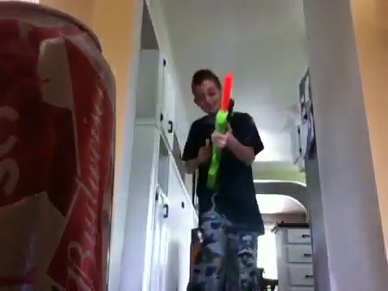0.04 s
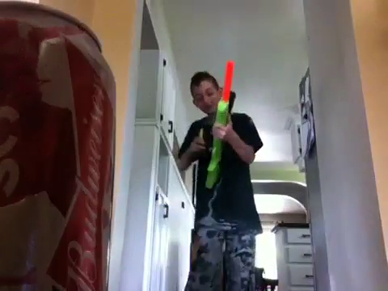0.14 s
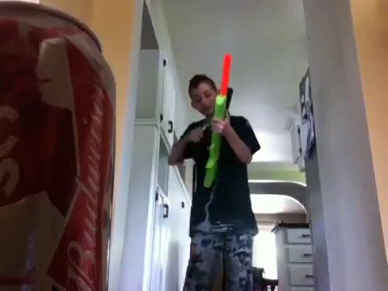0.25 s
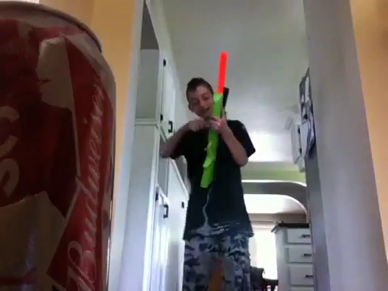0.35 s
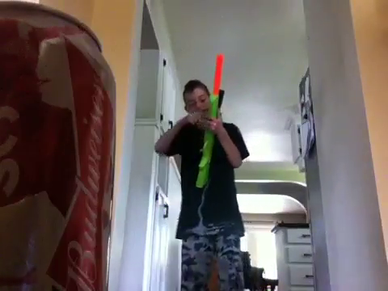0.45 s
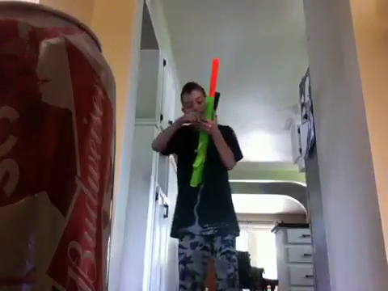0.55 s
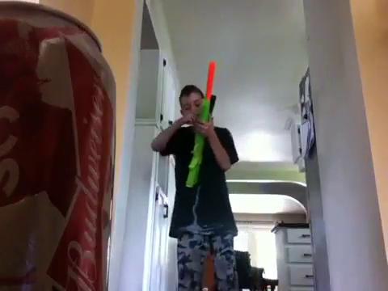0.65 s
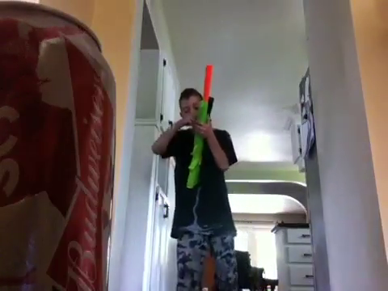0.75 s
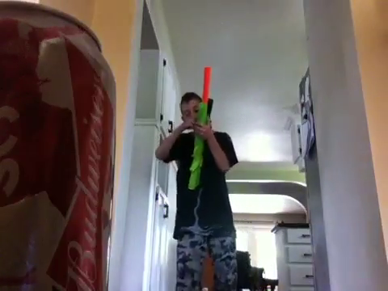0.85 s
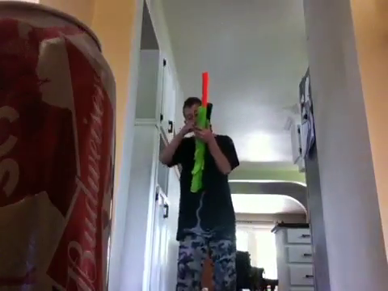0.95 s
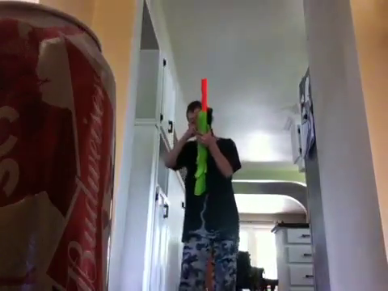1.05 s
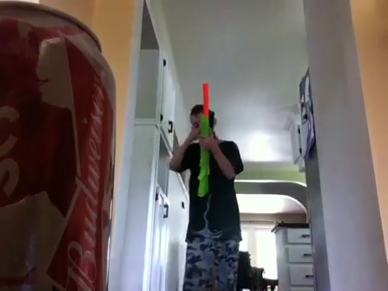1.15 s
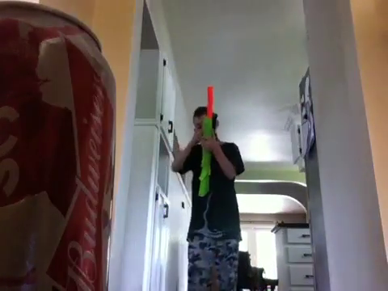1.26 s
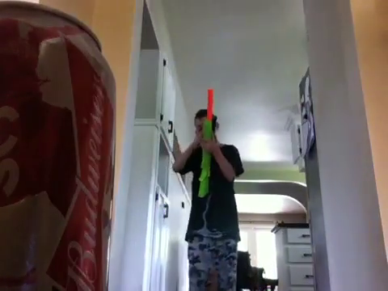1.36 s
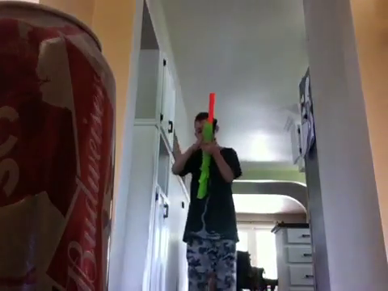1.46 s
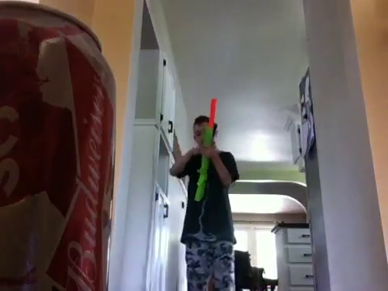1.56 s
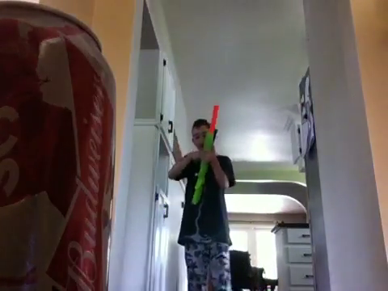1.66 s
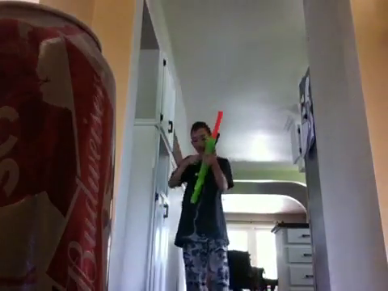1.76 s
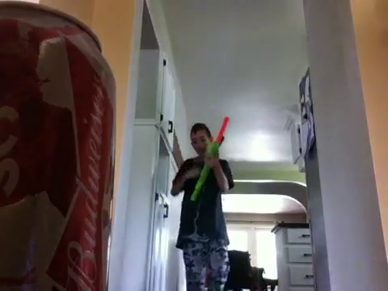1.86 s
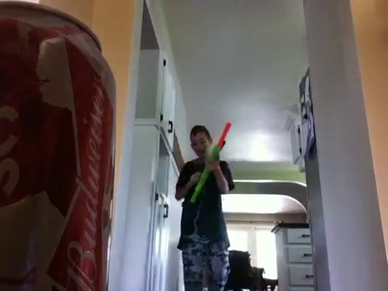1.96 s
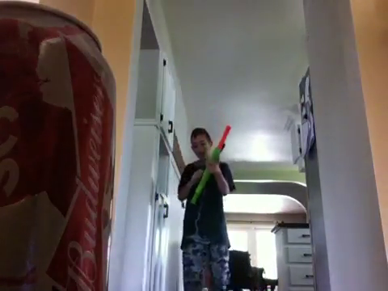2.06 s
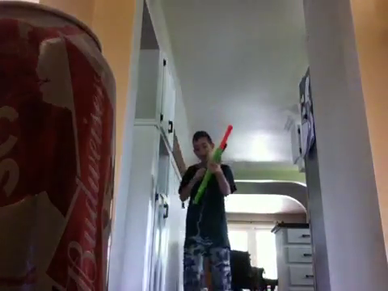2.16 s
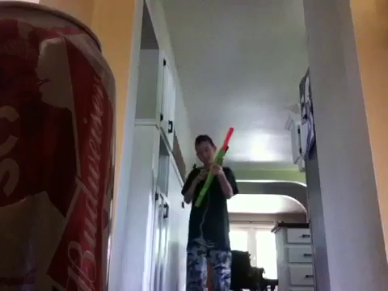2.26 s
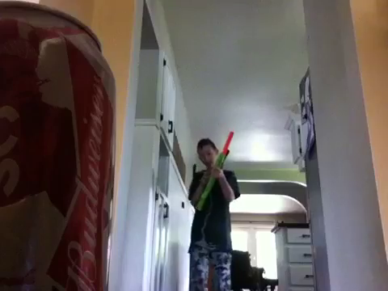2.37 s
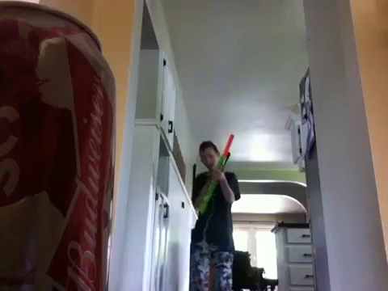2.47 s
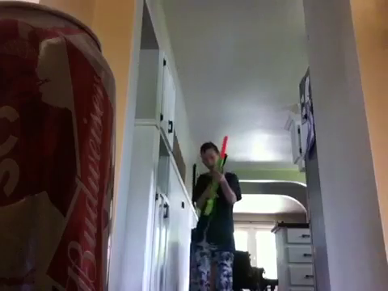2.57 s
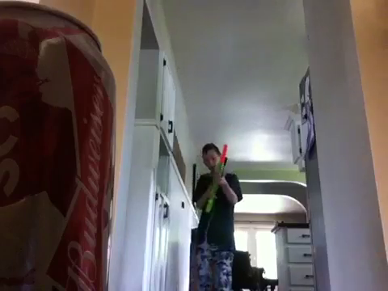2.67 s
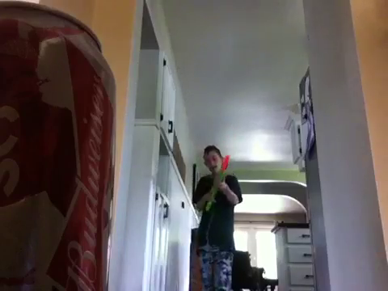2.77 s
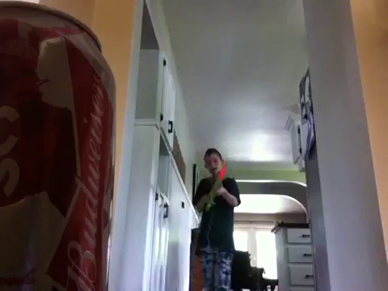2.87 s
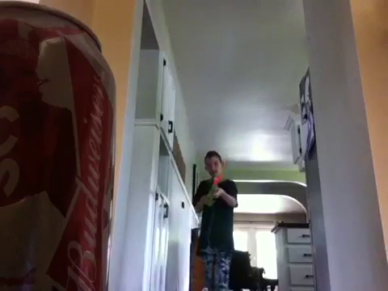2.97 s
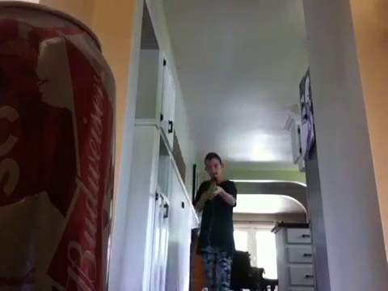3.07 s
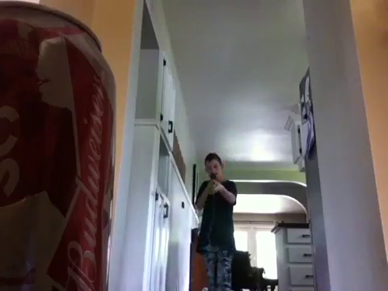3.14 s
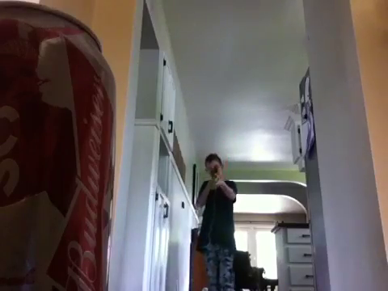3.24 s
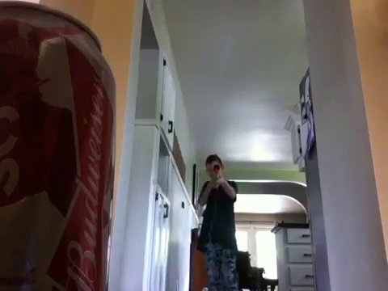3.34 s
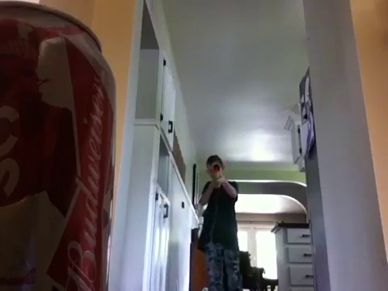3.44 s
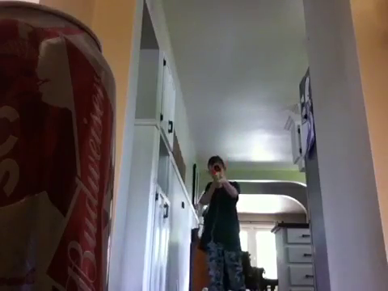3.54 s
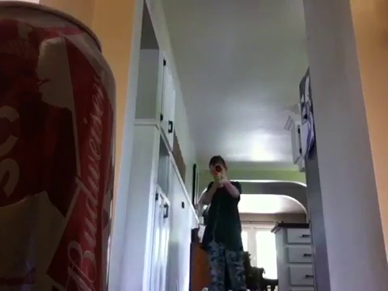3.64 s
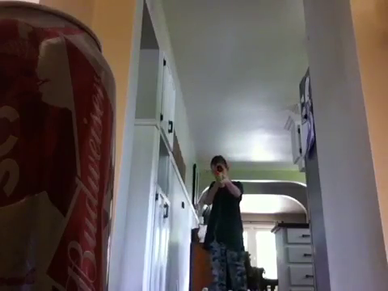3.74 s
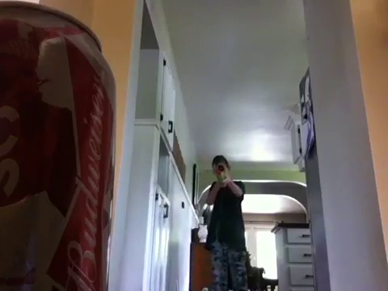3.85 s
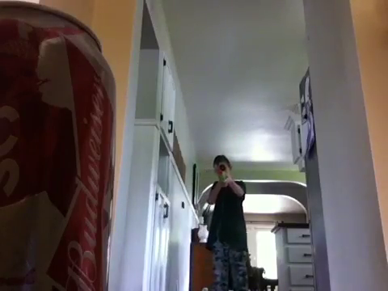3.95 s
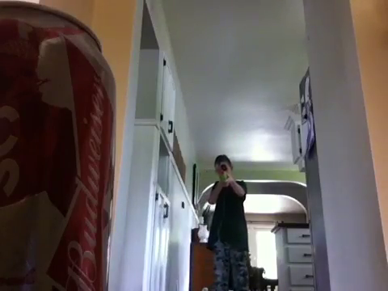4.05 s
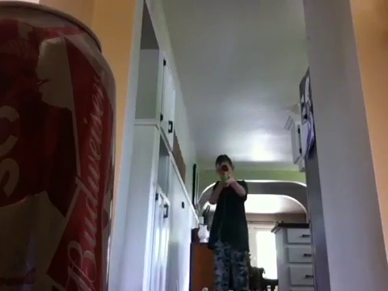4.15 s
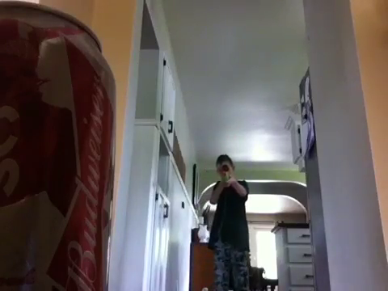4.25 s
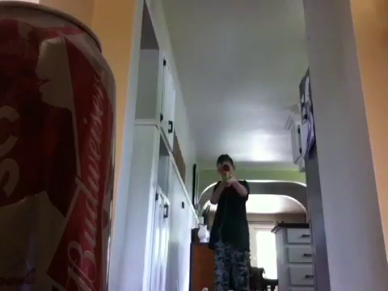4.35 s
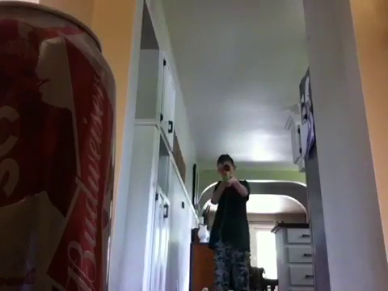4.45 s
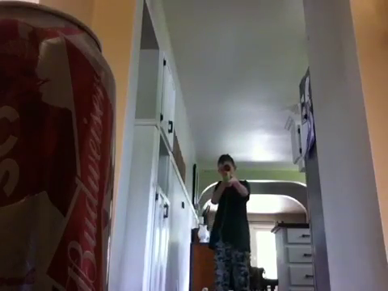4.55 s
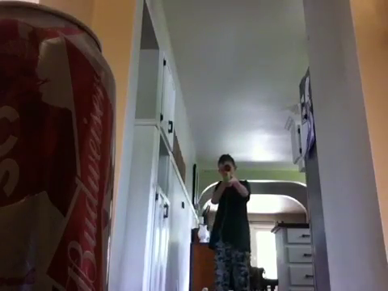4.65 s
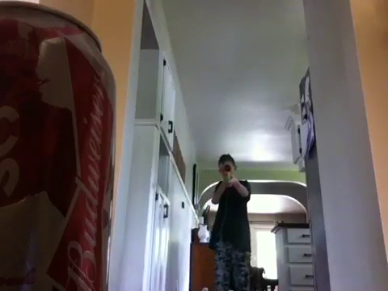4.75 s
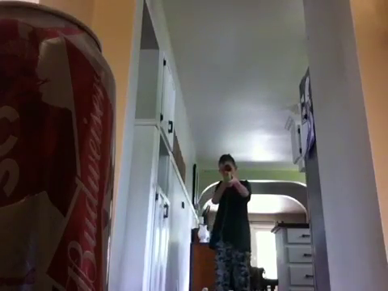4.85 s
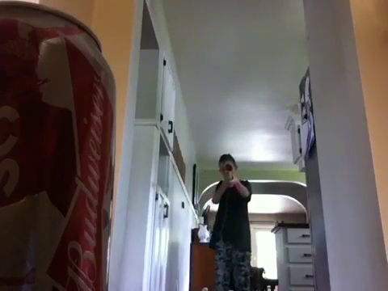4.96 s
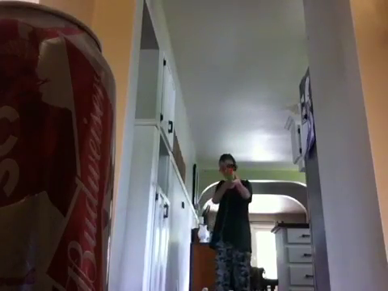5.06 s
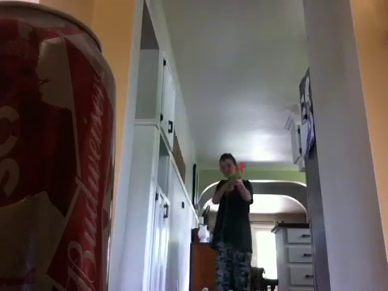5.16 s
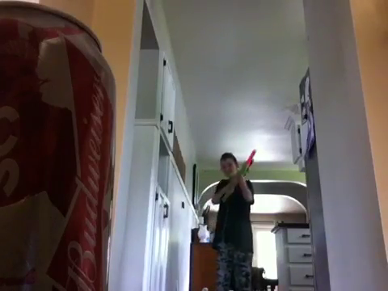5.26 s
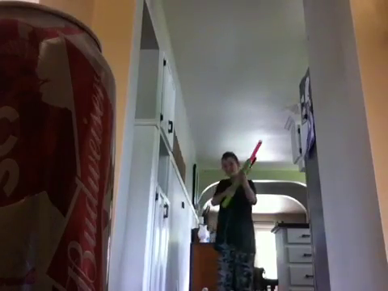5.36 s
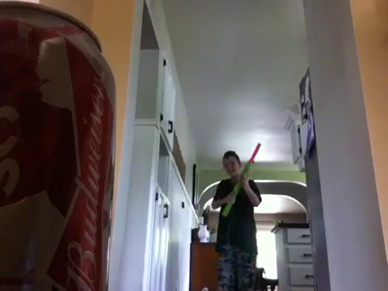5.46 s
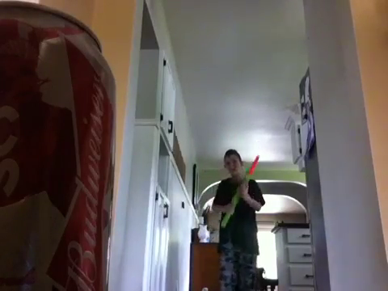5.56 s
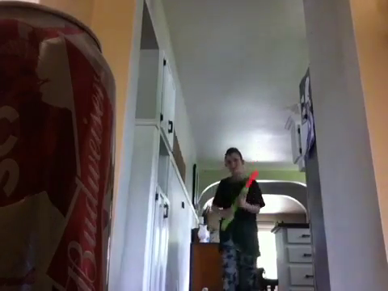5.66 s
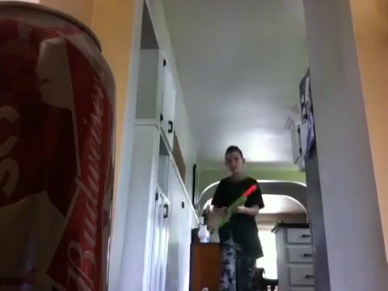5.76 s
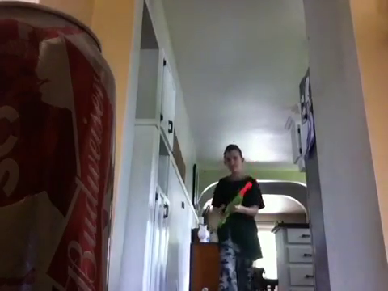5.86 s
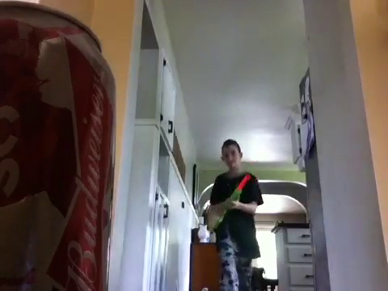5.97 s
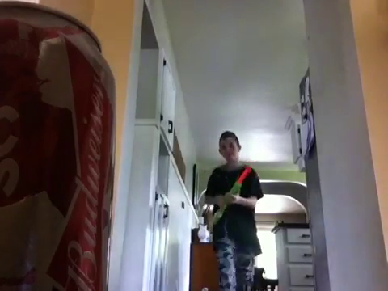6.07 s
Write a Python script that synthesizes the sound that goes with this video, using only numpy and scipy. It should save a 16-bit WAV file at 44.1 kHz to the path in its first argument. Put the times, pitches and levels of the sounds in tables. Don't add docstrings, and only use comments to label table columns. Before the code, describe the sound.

A small, hard kitchen with low appliance rumble, wandering faint hums and light hiss throughout. At 0 s a plastic clatter is already dying; at 0.18 a hollow bolt snaps home with a short boxy ring and room echo. A faint knock and brush come near 0.45, then barely audible ticks and airy hand rubs at 1.2-1.7. Hollow barrel knocks start at 2.03, the slide scrapes around 2.15-2.25, and a loud, sharp latch clacks at 2.55. Tiny knocks and a rub fade by 3; then only room tone. A small trigger tick at 4.89 precedes the plunger's hard, clattery slam at 4.93. At 5.12-5.13 the foam dart slaps the wall beside the microphone, the loudest, clipped, dry smack, with a brief panel hum. It taps the floor at 5.21. The background ducks, then creeps back beneath faint shoe taps at 5.6 and 6.08 and little plastic ticks from 5.77.

```python
import sys
import numpy as np
from scipy import signal
from scipy.io import wavfile
from scipy.ndimage import uniform_filter1d

SR = 44100
rng = np.random.default_rng(int(sys.argv[2]) if len(sys.argv) > 2 else 0)


def volts(x):
    e = np.asarray(x, float) / 20
    return 10 ** e


def wav_out(sig):
    wavfile.write(sys.argv[1], SR, np.round(np.clip(np.atleast_2d(sig).T, -1, 1) * 32767).astype(np.int16))


N = 269451

# start_s, peak_db, ring_hz, crack_db (against the ring)
BOLT_BLOWS = [
    (.139, -47, 790, -5),
    (.159, -48, 804, -4),
    (.1816, -17, 806, -4),
    (.182, -32.5, 3320, 1),
    (.184, -39, 2170, 6),
]
BARREL_KNOCKS = [
    (2.0265, -37, 860, -8),
    (2.0315, -38, 837, 1),
    (2.12, -40, 760, -6),
    (2.21, -41, 760, -6),
    (2.2245, -32, 1200, -6),
    (2.5135, -41, 740, -2),
    (2.5325, -34, 790, -10),
    (2.845, -45, 1047, -6),
    (.489, -43, 790, 0),
]
SMALL_TICKS = [
    (1.2205, -47, 3330, 0),
    (1.285, -55, 4130, 7),
    (2.971, -50, 2530, 4),
    (4.8862, -41.5, 3536, 4),
    (5.77, -47, 2100, 2.5),
    (5.83, -55, 6520, -4),
    (5.885, -57, 7020, 0),
    (6.0655, -49.5, 4506, 2.5),
]
LATCH_BLOWS = [
    (2.5415, -30, 2200, 8.5),
    (2.5502, -17.5, 845, -1.5),
    (2.5496, -8.5, 2420, -4),
    (2.5547, -11.5, 1850, 1),
    (2.5615, -16, 1000, -3),
]
PLUNGER_BLOWS = [
    (4.9272, -16.5, 4530, 2),
    (4.9291, -11.5, 3900, 0.5),
    (4.9353, -11, 1295, 4),
    (4.9402, -18, 1025, 4),
    (4.9468, -11, 910, -6),
]
TIP_BLOWS = [
    (5.1185, -19, 4900, 0),
    (5.1199, -6.5, 6990, 0),
    (5.1281, -5, 4290, 0),
    (5.1413, -31, 4565, 0),
]
BODY_BLOWS = [
    (5.1276, 0.5, 1902, -6.5),
    (5.128, -1, 2695, -15.5),
    (5.1288, -1.5, 960, -12),
    (5.1335, -13, 326, -0.5),
]
PANEL_BLOWS = [
    (5.139, -20, 395, -7.5),
    (5.146, -18, 227.4, -7),
]
DROP_BLOWS = [
    (5.2137, -19.5, 1500, 3),
    (5.2195, -28, 1750, 3),
]
STEP_BLOWS = [
    (5.583, -48, 400, 0),
    (5.6035, -43, 1420, 5),
    (5.992, -47.5, 900, 2),
    (6.08, -39, 600, -5),
    (6.092, -45, 1200, 2),
]

# peak_s, peak_db, swell_db_per_s, fade_db_per_s
CLATTER_STROKES = [
    (0.0, -43, 300, 160),
]
BRUSH_STROKES = [
    (.44, -65.5, 50, 400),
    (1.24, -62, 2000, 380),
    (1.286, -60.5, 1500, 390),
    (1.508, -64.5, 520, 380),
    (1.596, -57.5, 230, 230),
    (1.72, -69, 400, 1500),
    (2.938, -66.5, 210, 110),
]
SLIDE_STROKES = [
    (2.135, -54.5, 380, 120),
    (2.23, -46, 140, 295),
]

# freq_hz, level_db (per Hz)
BOLT_COLOUR = [(120, -26), (300, -22), (500, -10.5), (820, 0.5), (1150, -4), (2000, -16), (3200, -16.5),
               (5500, -23), (10000, -26), (17000, -42)]
BARREL_COLOUR = [(120, -47), (400, -14.5), (820, -14.5), (1500, 4), (3000, 2.5), (5500, -8), (10000, -17.5),
                 (17000, -33)]
TICK_COLOUR = [(240, -41), (400, 4), (1240, -7), (2550, -8.5), (3600, -8.5), (5760, -20.5), (9660, -23.5),
               (17000, -42)]
LATCH_COLOUR = [(60, -47), (150, -17.5), (330, -13.5), (480, -9), (800, -5), (1100, -1), (1450, -14),
                (2200, -2.5), (4500, -12), (10000, -20), (17000, -38)]
PLUNGER_COLOUR = [(35, -60), (60, -28.5), (232, -8.5), (356, -17.5), (431, -4.5), (899, -5.5), (1040, -1),
                  (1480, -12.5), (2270, -9.5), (3320, -16), (17500, -25.5)]
FOAM_COLOUR = [(350, -46.5), (600, -9.5), (3220, -0.5), (5900, -8.5), (6990, -2.5), (8280, -10.5),
               (10200, -4.5), (17500, -20.5)]
WALL_COLOUR = [(60, -24.5), (150, -0.5), (300, -1.5), (800, -4), (1300, -7), (2000, -10), (3000, -19),
               (5700, -30), (10400, -40.5), (17500, -56)]
FLOOR_COLOUR = [(150, -25), (400, -4), (1200, 0), (2800, -2), (4000, -17), (6500, -42), (17000, -60)]
SOLE_COLOUR = [(59, -64), (90, 0), (283, 5), (981, -10), (1440, -14.5), (2730, -27), (2890, -32),
               (12000, -34), (15600, -68), (22000, -120)]
CLATTER_COLOUR = [(180, -11), (400, -6), (900, -3), (1500, -9), (1800, 1.5), (2100, -8), (3200, -11.5),
                  (6500, -12.5), (9250, -12.5), (17000, -27)]
BRUSH_COLOUR = [(1500, -11.5), (4000, -3), (6500, -12), (9500, -3), (13000, -13), (17000, -13.5)]
SLIDE_COLOUR = [(180, -47.5), (400, 3.5), (760, 8.5), (1400, 8), (2200, -1.5), (4000, -2.5), (6000, -9),
                (9000, -13.5), (17000, -21)]
# freq_hz, level_db (per Hz)
TONE_COLOUR = [(18, -75.5), (30, -48.5), (69, -35.5), (87, -26.5), (161, -1.5), (199, -3), (289, -1.5),
               (455, -7), (578, -10.5), (795, -15.5), (1870, -17), (2940, -23), (15300, -28.5),
               (17500, -31.5)]
# freq_hz, t60_s
KITCHEN_DECAY = [(120, 0.27), (330, 0.46), (870, 0.52), (2300, 0.47), (6000, 0.44), (14000, 0.33)]

# ring_t60_s (at 1 kHz), damping_power (above 0 higher rings die sooner, below 0 later),
# send_db (to the room, hardest blow), softer_send_db (extra per dB softer)
BOLT_RING = (.04, 1.3, -10.5, 0.205)
BARREL_RING = (.022, 1.4, -6.5, .01)
TICK_RING = (.0095, .05, -1, -0.04)
LATCH_RING = (0.05, 0.8, -6, 0.086)
PLUNGER_RING = (.018, .3, -1.6, .05)
TIP_RING = (.02, 1.34, -22.5, 0.24)
BODY_RING = (.009, 0.7, -14.5, 0.44)
PANEL_RING = (0.16, -0.01, -11.5, 1)
DROP_RING = (0.03, 1, -11, -0.14)
SOLE_RING = (.021, -0.9, -5, 0.1)


def evened(x):
    return x / np.sqrt(np.mean(x ** 2) + 1e-20)


def read(points, hz):
    f, value = np.transpose(points)
    return np.interp(np.log(hz + 1), np.log(f + 1), value)


def add(mix, s, sound):
    part = mix[round(s * SR):][:len(sound)]
    part += sound[:len(part)]


def colour(x, points):
    level_db = np.maximum(read(points, abs(np.fft.fftfreq(4096, 1 / SR))), -100)
    log_gain = np.log(volts(level_db))
    phase = -signal.hilbert(log_gain).imag
    taps = np.fft.ifft(np.exp(log_gain + 1j * phase)).real[:2048]
    return signal.oaconvolve(x, taps)[:len(x)]


def reflections(gap=300):
    taps = np.zeros(32000)
    at = np.arange(0, 32000, 10) + rng.integers(0, 10, 3200)
    taps[at] = rng.choice([-1., 1.], len(at))
    hz, t, z = signal.stft(taps, SR, nperseg=256)
    decay = volts(-60 * t / read(KITCHEN_DECAY, hz)[:, None])
    tail = signal.istft(z * decay, SR, nperseg=256)[1]
    tail *= np.clip(np.arange(len(tail)) / gap - 1, 0, 1)
    return tail / np.linalg.norm(tail)


def strikes(rows, spectrum, material, crack_s, overtone, overtone_db, rise_s, ring_in_room_db):
    out, t = np.zeros(N), np.arange(4096) / SR
    snap = colour(1. * (t == 0), spectrum)
    contact = 1 - np.exp(-t / rise_s)
    ring_s, damping, send_db, softer = material
    hardest_db = max(row[1] for row in rows)
    for s, db, hz, crack_db in rows:
        t60 = ring_s * (1e3 / hz) ** damping
        room_db = send_db + softer * (hardest_db - db)
        noise = rng.standard_normal(len(t)) * contact * volts(-60 * t / crack_s)
        crack = colour(noise, spectrum)
        ring = volts(-60 * t / t60) * np.sin(2 * np.pi * hz * t)
        ring += volts(overtone_db - 120 * t / t60) * np.sin(2 * np.pi * overtone * hz * t)
        ring *= contact / abs(ring * contact).max()
        blow = volts(db) * (ring + volts(crack_db) * crack / abs(crack).max())
        radiated = snap / np.linalg.norm(snap) + volts(ring_in_room_db) * ring / np.linalg.norm(ring)
        echoes = signal.fftconvolve(radiated, reflections())
        add(out, s, blow)
        add(out, s, volts(room_db) * np.linalg.norm(blow) * echoes)
    return out


def rubbing(strokes, spectrum, slips_per_s, spread_db, room_db):
    slips = volts(spread_db * np.minimum(rng.exponential(1, N), 4)) * rng.standard_normal(N)
    slips *= rng.random(N) < slips_per_s / SR
    slips = evened(colour(slips, spectrum))
    t = np.arange(N) / SR
    level = sum(volts(db - np.maximum(swell * (s - t), fade * (t - s))) for s, db, swell, fade in strokes)
    dry = slips * uniform_filter1d(level, 300)
    return dry + volts(room_db) * signal.fftconvolve(dry, reflections())[:N]


def room_tone(patchy_db=.9, hum_db=2.2, swell_db=.3):
    frames, hz = N // 512 + 5, np.fft.rfftfreq(2048, 1 / SR)
    a, b, patches, hums = rng.standard_normal((frames, 1025, 4)).T
    patches = evened(uniform_filter1d(uniform_filter1d(patches, 16, 0), 6, 1))
    hums = evened(uniform_filter1d(uniform_filter1d(hums, 2, 0), 24, 1))
    swell = evened(uniform_filter1d(rng.standard_normal(frames), 20))
    bass = 1 / (1 + (hz[:, None] / 1100) ** 2)
    field_db = bass * (patchy_db * patches + hum_db * hums) + swell_db * swell
    z = (a + 1j * b) * volts(read(TONE_COLOUR, hz)[:, None] + field_db)
    tone = signal.istft(z, nperseg=2048, noverlap=1536)[1][:N]
    return volts(-58) * evened(tone)


def clatter():
    return rubbing(CLATTER_STROKES, CLATTER_COLOUR, slips_per_s=14000, spread_db=2, room_db=-7.5)


def bolt():
    return strikes(BOLT_BLOWS, BOLT_COLOUR, BOLT_RING, crack_s=.02, overtone=1.785, overtone_db=-13,
                   rise_s=.00072, ring_in_room_db=-6)


def hand_brush():
    return rubbing(BRUSH_STROKES, BRUSH_COLOUR, slips_per_s=4800, spread_db=1, room_db=-4)


def barrel_knocks():
    return strikes(BARREL_KNOCKS, BARREL_COLOUR, BARREL_RING, crack_s=.015, overtone=1.8, overtone_db=-10,
                   rise_s=.0008, ring_in_room_db=-5)


def small_ticks():
    return strikes(SMALL_TICKS, TICK_COLOUR, TICK_RING, crack_s=.025, overtone=.65, overtone_db=-1.5,
                   rise_s=.00045, ring_in_room_db=-15.5)


def slide_scrape():
    return rubbing(SLIDE_STROKES, SLIDE_COLOUR, slips_per_s=3500, spread_db=2.2, room_db=-4)


def latch():
    return strikes(LATCH_BLOWS, LATCH_COLOUR, LATCH_RING, crack_s=.045, overtone=1.7, overtone_db=-6,
                   rise_s=.0002, ring_in_room_db=-16)


def plunger():
    return strikes(PLUNGER_BLOWS, PLUNGER_COLOUR, PLUNGER_RING, crack_s=.081, overtone=1.6, overtone_db=2,
                   rise_s=.00039, ring_in_room_db=-11)


def dart_hit():
    hit = strikes(TIP_BLOWS, FOAM_COLOUR, TIP_RING, crack_s=.006, overtone=1.8, overtone_db=-2.5,
                  rise_s=.0003, ring_in_room_db=-21.5)
    for blows, ring in [(BODY_BLOWS, BODY_RING), (PANEL_BLOWS, PANEL_RING)]:
        hit += strikes(blows, WALL_COLOUR, ring, crack_s=.015, overtone=1.5, overtone_db=-3,
                       rise_s=.0004, ring_in_room_db=-20)
    return hit


def dart_drop():
    return strikes(DROP_BLOWS, FLOOR_COLOUR, DROP_RING, crack_s=.012, overtone=1.7, overtone_db=-2,
                   rise_s=.0005, ring_in_room_db=-18)


def footsteps():
    return strikes(STEP_BLOWS, SOLE_COLOUR, SOLE_RING, crack_s=.059, overtone=1.71, overtone_db=-9,
                   rise_s=.00032, ring_in_room_db=-9)


def scene():
    tone = room_tone()
    handling = clatter() + hand_brush() + slide_scrape()
    blaster = bolt() + barrel_knocks() + small_ticks() + latch() + plunger()
    dart = dart_hit() + dart_drop()
    action = handling + blaster + dart + footsteps()
    low_cut = signal.butter(2, 100, "highpass", fs=SR, output="sos")
    return (signal.sosfilt(low_cut, action) + tone)[None]


def low_pass(x):
    return signal.sosfilt(signal.butter(12, 18280, fs=SR, output="sos"), x)


def record(dry):
    peak_db = 20 * np.log10(abs(dry[0]) + 1e-9)
    fall_db = np.arange(N) * 8 / SR
    held_db = np.maximum.accumulate(peak_db + fall_db) - fall_db
    over_db = np.maximum(held_db + 8.5, 0)
    ducked = dry / volts(0.62 * uniform_filter1d(over_db, 400, origin=199))
    top_cut = signal.firwin(255, 17700, window=("kaiser", 8), fs=SR)
    limited = signal.oaconvolve(np.clip(ducked, -1, 1), top_cut[None], "same")
    return low_pass(limited - 1e-4)


dry = scene()
out = record(dry)
wav_out(out)
```